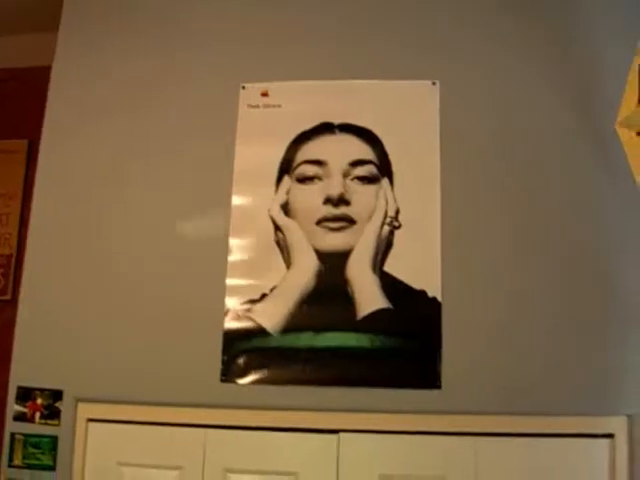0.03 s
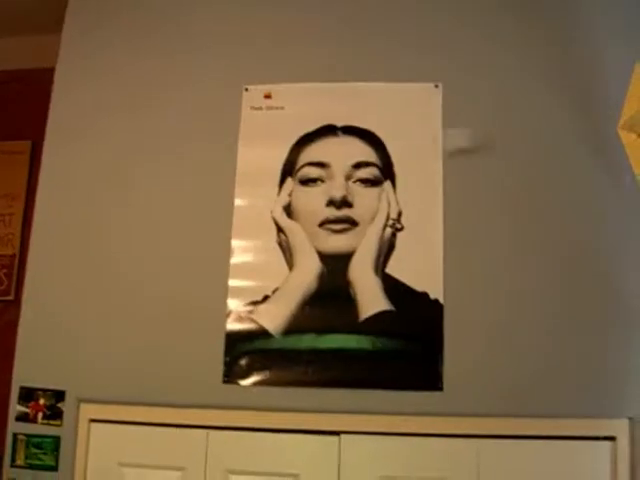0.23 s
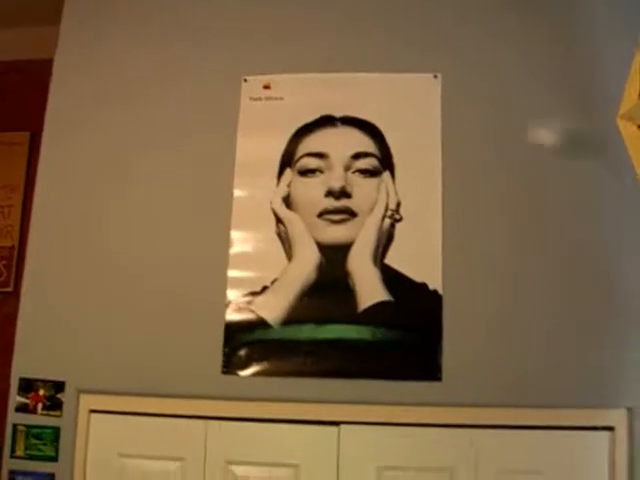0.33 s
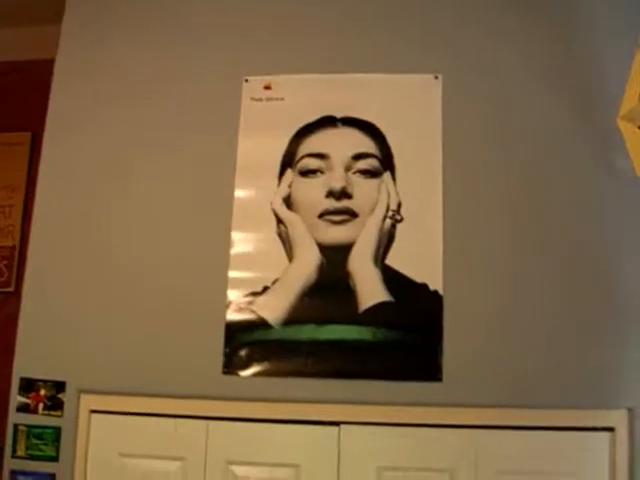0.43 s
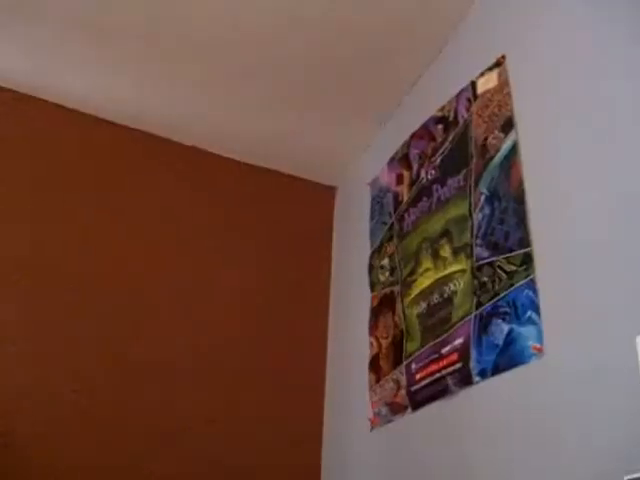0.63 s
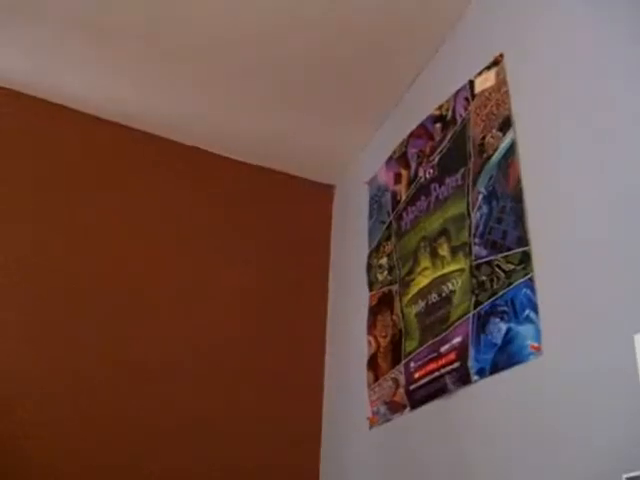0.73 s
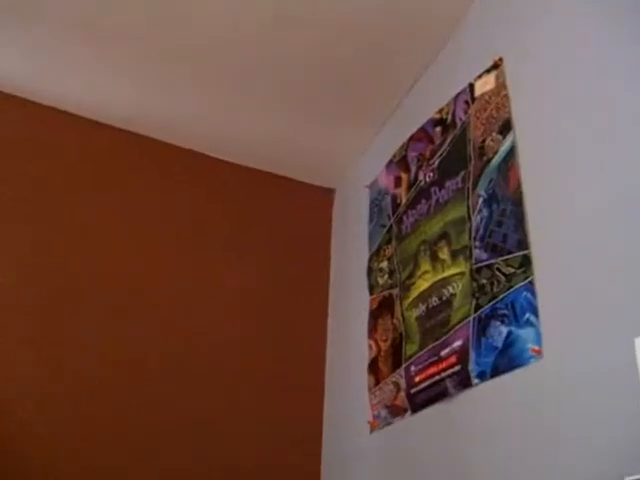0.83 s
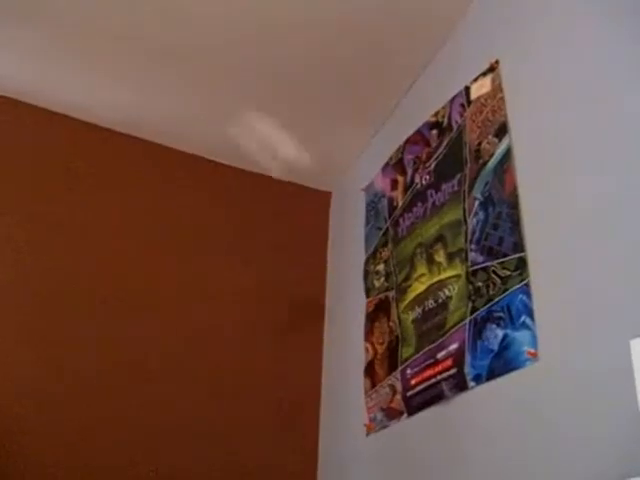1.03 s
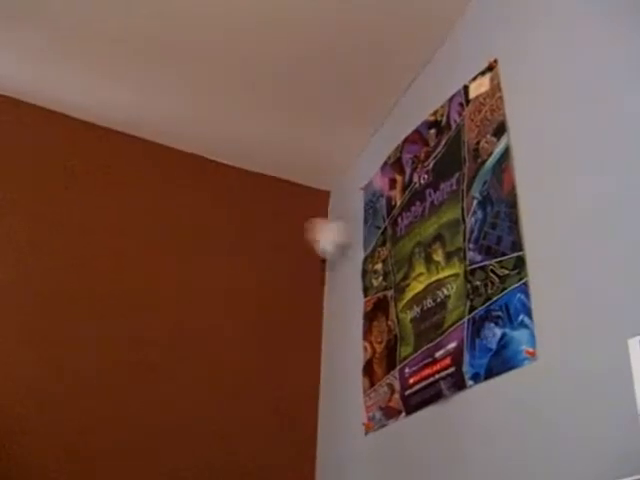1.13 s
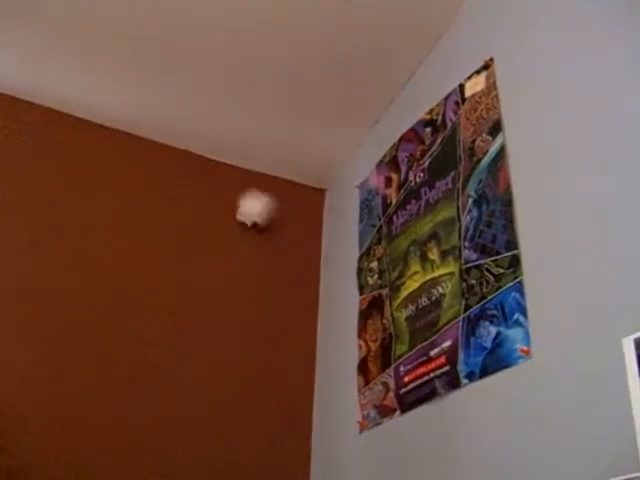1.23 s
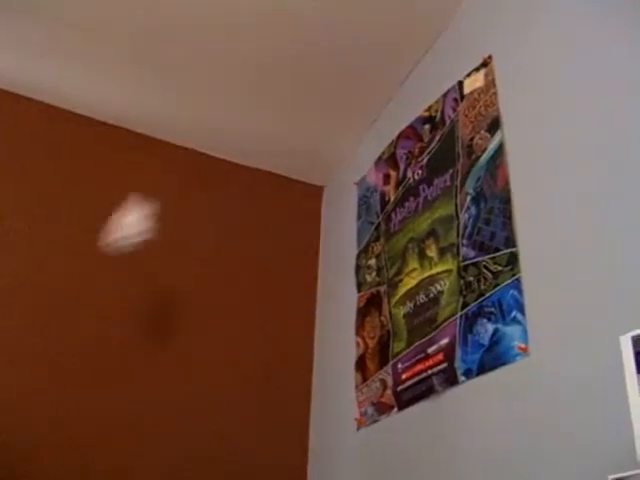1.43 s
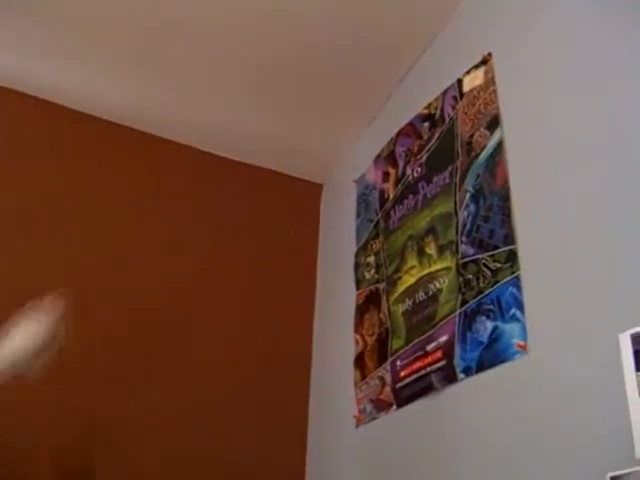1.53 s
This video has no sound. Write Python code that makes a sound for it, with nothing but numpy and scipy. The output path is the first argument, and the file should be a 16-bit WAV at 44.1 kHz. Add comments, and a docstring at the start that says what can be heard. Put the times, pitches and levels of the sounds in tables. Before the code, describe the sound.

A crumpled paper ball smacks a bedroom wall with a low boom, then knocks again. It rustles in a hand, is swatted close to the microphone and grazes the far walls. Soft hiss and a thin camera whine continue behind.

```python
"""A paper ball batted about a bedroom

Each knock of the crumpled ball is a quick crush of many buckling creases, then the room's echo.
It hits a wall, which booms; a second knock stops short. It rustles in the hand, is tossed and
swatted, and grazes the far walls. Behind it all are a soft hiss and a camera's whining motor."""
import sys
import numpy as np
from scipy import signal
from scipy.fft import rfft, irfft
from scipy.io import wavfile
from scipy.ndimage import uniform_filter1d

SR = 44100
rng = np.random.default_rng(int(sys.argv[2]) if len(sys.argv) > 2 else 0)


def store_wav(level_fs):
    """Save 16-bit WAV to argv[1]."""
    pcm = np.round(np.clip(np.atleast_2d(level_fs), -1, 1) * 32767)
    wavfile.write(sys.argv[1], SR, pcm.T.astype(np.int16))


N = 70560
T = np.arange(N) / SR
CUTOFF_S = 0.609  # the second knock stops and the background steps up

# tone colour of paper hitting the wall (f/Hz, level/dB)
WALL_COLOUR = [(90, -13), (200, -19.5), (420, -14.5), (560, -16), (780, -12), (960, -6.5), (1150, -12.5),
               (2000, -5), (2500, -5), (3000, -3.5), (3650, -2.5), (4500, -6.5), (5900, -12), (7700, -9),
               (10000, -13.5), (14300, -24.5), (15500, -29)]


def wall_knock():
    """The ball crumples against a wall in four quick touches."""
    # the touches (t/s, rise/s, hold/s, fade/s, level/dB, treble/dB per octave)
    touches = [(0.2026, 0.00057, 0.0078, 0.0041, -26.5, 3.5), (0.2099, 0.00018, 0.00046, 0.0074, -19, 0.5),
               (0.2130, 0.0014, 0.0029, 0.0036, -13, 1.5), (0.219, 0.0012, 0.0034, 0.0094, -22, -0.5)]
    return contacts(touches, WALL_COLOUR, echo_db=0)


def short_knock():
    """A second knock that stops abruptly, echo and all."""
    # the touches (t/s, rise/s, hold/s, fade/s, level/dB, treble/dB per octave)
    touches = [(0.6003, 0.00065, 0.002, .002, -23, -2.5), (0.6030, 0.0027, 0.0052, 0.0018, -11, 1)]
    # tone colour of this knock (f/Hz, level/dB)
    spectrum = [(47, -31), (80, -3), (269, -23), (521, 0.5), (903, -19), (1130, -1), (1500, -21),
                (2380, 1.5), (2660, -4), (3620, -2), (5040, -6.5), (6010, -2), (7170, -10.5), (7830, -0.5),
                (9980, -10.5), (10900, -7), (15500, -20)]
    return contacts(touches, spectrum, echo_db=-5.5) * (T < CUTOFF_S)


def swat():
    """A swat close by crushes the paper sharply."""
    # the touches (t/s, rise/s, hold/s, fade/s, level/dB, treble/dB per octave)
    touches = [(1.1882, 0.001, 0.0016, 0.00033, -8.5, 1), (1.1915, 0.00038, 0.0021, 0.0017, -11, -1.5),
               (1.1950, 0.0012, 0.00063, 0.00093, -11, 1.5)]
    # tone colour of the swat (f/Hz, level/dB)
    spectrum = [(50, -30), (90, -9), (200, -8.5), (550, -3), (850, -8), (1400, -8), (1800, -8.5),
                (3000, -3.5), (4400, -0.5), (6500, -1.5), (8300, -10), (11000, -10), (15500, -21)]
    return contacts(touches, spectrum, echo_db=-5.5)


def hand_crinkle(snap_s=0.00035, echo_db=-5.5):
    """A hand squeezes and releases the ball, so its creases snap and rustle."""
    # single creases snapping (t/s, level/dB)
    snaps = [(0.745, -31.5), (0.7655, -30.5), (0.786, -25.5), (0.7954, -27), (0.8222, -26)]
    # squeezes (t/s, rise/s, hold/s, fade/s, level/dB, treble/dB per octave)
    squeezes = [(0.8222, 0.00032, .001, 0.0087, -30.5, -0.5), (0.8768, .0004, 0.0015, 0.0093, -26, -1),
                (0.8850, 0.00048, 0.0012, 0.00084, -15, -0.5), (0.8875, .001, 0.0026, 0.0042, -21.5, -0.5)]
    # loudness of the rustle (t/s, level/dB)
    loudness = [(0.735, -57.5), (0.765, -41.5), (0.81, -42), (0.85, -38), (0.875, -33.5), (0.915, -34.5),
                (0.95, -51), (0.99, -82)]
    # tone colour of paper in the hand (f/Hz, level/dB)
    spectrum = [(120, -45), (200, -10), (378, -10.5), (488, -7), (607, -14), (742, -4), (940, -10.5),
                (1950, -6), (2800, -1.5), (3070, -4.5), (5800, 1), (9660, -13), (15500, -18)]
    snapping = sum(crush(spectrum, start, snap_s / 2, snap_s / 2, snap_s, db, 0) for start, db in snaps)
    squeezing = contacts(squeezes, spectrum, echo_db)
    return squeezing + room(snapping + rustle(loudness, spectrum), echo_db)


def wall_skid(echo_db=-0.5):
    """The swatted ball grazes the far walls and slides along them."""
    # glancing touches (t/s, rise/s, hold/s, fade/s, level/dB, treble/dB per octave)
    grazes = [(1.2088, 0.00046, 0.0087, 0.0074, -24.5, -2.5), (1.2502, .0003, 0.00078, 0.0027, -19, 1.5),
              (1.260, 0.0061, 0.011, 0.017, -25.5, -1), (1.3085, 0.00056, 0.0054, 0.0092, -24, 2),
              (1.326, 0.0012, 0.0045, 0.0076, -33, -4)]
    # loudness of the slide (t/s, level/dB)
    loudness = [(1.19, -90), (1.215, -30.5), (1.30, -32.5), (1.345, -46), (1.40, -59.5)]
    # tone colour of grazing paper (f/Hz, level/dB)
    spectrum = [(150, -16.5), (250, -10.5), (380, -20), (620, -3), (1000, -5.5), (1600, -3), (2000, 0.5),
                (2400, -3.5), (3100, 1.5), (6200, 1), (8000, -1.5), (11000, -10), (15500, -18)]
    return contacts(grazes, spectrum, echo_db) + room(rustle(loudness, spectrum), echo_db)


def contacts(touches, spectrum, echo_db, echoes=4):
    """Each side of the ball crackles in its own way: one is heard directly, the rest as echoes."""
    direct, *sides = [sum(crush(spectrum, *touch) for touch in touches) for _ in range(echoes + 1)]
    return direct + amp(echo_db) * sum(reflections(side) for side in sides) / np.sqrt(echoes)


def crush(spectrum, start, rise, hold, fade, db, treble_db):
    """One touch: a burst of creases, coloured by the ball and what it meets."""
    at = int(start * SR)
    shape = envelope(start, rise, hold, fade)[at:at + SR // 10]
    burst = shape * creases(per_second=8000, spread_db=2.5, size=len(shape))
    crackle = evened(burst) * shape ** 0.25  # trims what the evening-out smears in time
    sound = levelled(colour(crackle, spectrum, treble_db), shape, db)
    return np.r_[np.zeros(at), sound, np.zeros(N)][:N]


def rustle(loudness, spectrum):
    """Steady creasing that follows a loudness curve."""
    gain = amp(np.interp(T, *np.transpose(loudness)))
    return colour(creases(per_second=1700, spread_db=3.5) * gain, spectrum)


def creases(per_second, spread_db, size=N, rubbing=0.58):
    """Buckling paper makes clicks of uneven size, over the hiss of rubbing."""
    strength = amp(spread_db * np.minimum(rng.exponential(1, size), 3))
    clicks = strength * rng.choice([-1, 1], size) * (rng.random(size) < per_second / SR)
    return unit(unit(clicks) + rubbing * rng.standard_normal(size))


def wall_boom(start_s=0.212, rise_s=0.027):
    """The plasterboard wall rings with low notes after the first knock."""
    # the wall's notes (f/Hz, level/dB, time to fade by 60 dB/s)
    notes = [(87.2, -28, 0.51), (98, -23, 0.18), (35.6, -34, 0.79), (200, -47, 0.21), (421, -43, 0.58)]
    t = np.maximum(T - start_s, 0)
    ringing = sum(amp(db - 60 * t / ring_s) * np.sin(2 * np.pi * hz * t) for hz, db, ring_s in notes)
    return np.minimum(t / rise_s, 1) * ringing


def dull_bumps():
    """Bursts of low noise that go with the throws and hits."""
    # the bumps (t/s, rise/s, fade/s, level/dB, f/Hz, width/Hz)
    bumps = [(0.147, 0.014, 0.072, -41.5, 31.2, 12), (0.918, 0.0094, 0.03, -34, 169, 280),
             (0.945, .005, 0.028, -37.5, 120, 130), (1.187, 0.0017, 0.016, -28, 192.5, 83),
             (1.249, 0.01, 0.058, -35.5, 163, 72)]
    out = np.zeros(N)
    for start, rise, fade, db, hz, width_hz in bumps:
        shape = envelope(start, rise, 0, fade)
        out += levelled(shape * band(hz, width_hz), shape, db)
    return out


def room(x, echo_db):
    """A sound together with its echo."""
    return x + amp(echo_db) * reflections(x)


def reflections(x, delay_s=0.0023, build_s=0.0057):
    """Many reflections blur into one echo, whose high notes die first."""
    # how long the room rings (f/Hz, time to fade by 60 dB/s)
    ring_times = [(150, 0.5), (500, .5), (1400, 0.31), (3700, 0.3352), (8000, 0.2434), (15000, 0.34)]
    # tone colour of the echo (f/Hz, level/dB)
    spectrum = [(100, -3), (500, -1), (1500, 0.5), (4000, -7), (8000, 1), (11000, -6), (15000, -1.5)]
    hz, t, noise = signal.stft(rng.standard_normal(SR // 2), SR, nperseg=256)
    fading = amp(read(spectrum, hz)[:, None] - 60 * t / read(ring_times, hz)[:, None])
    tail = signal.istft(noise * fading, SR, nperseg=256)[1]
    tail *= np.clip((T[:len(tail)] - delay_s) / build_s, 0, 1)
    return signal.fftconvolve(x, tail / np.linalg.norm(tail))[:N]


def steady_hiss(early_db=-47.5, late_db=-46.5):
    """Soft noise that changes colour and gets a little louder at CUTOFF_S."""
    # tone colour of the early hiss (f/Hz, level/dB)
    early_colour = [(15, -32), (25, 5), (90, -3), (200, -8), (370, -8.5), (520, -8.5), (1170, -13),
                    (2500, -17), (5700, -21), (7500, -14.5), (9000, -19), (15500, -18.5)]
    # tone colour of the late hiss (f/Hz, level/dB)
    late_colour = [(15, -25), (25, 4.5), (90, -8.5), (230, -7), (570, -5.5), (720, -9), (2100, -18),
                   (6000, -19.5), (7500, -14), (9000, -21), (15500, -20)]
    early = amp(early_db) * colour(rng.standard_normal(N), early_colour)
    late = amp(late_db) * colour(rng.standard_normal(N), late_colour)
    return np.where(T < CUTOFF_S, early, late)


def motor_whine(waver_depth=0.04, waver_hz=30.2):
    """A camera's motor makes thin, wavering tones, louder from CUTOFF_S on."""
    # the motor's tones (f/Hz)
    pitches = [7522, 7494, 6578, 15044, 13184]
    # loudness of each tone (early level/dB, late level/dB)
    levels = [(-49, -45), (-64.5, -60.5), (-65, -59), (-74, -59.5), (-77, -69)]
    out = np.zeros(N)
    for hz, (early_db, late_db) in zip(pitches, levels):
        tone = np.sin(2 * np.pi * (hz * T + rng.random()))
        waver = 1 + waver_depth * band(waver_hz, waver_hz)
        out += amp(np.where(T < CUTOFF_S, early_db, late_db)) * unit(tone * waver)
    return out


def hiss_puffs(rise_s=0.0023):
    """A brief fading hiss at the very start, and another as the second knock stops."""
    # the puffs (t/s, fade/s, level/dB)
    puffs = [(0.0, 0.054, -48), (0.607, 0.014, -36.5)]
    return sum(amp(db) * envelope(start, rise_s, 0, fade) * colour(rng.standard_normal(N), WALL_COLOUR)
               for start, fade, db in puffs)


def amp(db):
    """Turns decibels into a gain."""
    return 10 ** (np.asarray(db) / 20)


def unit(x):
    """Scales a sound to an average power of 1."""
    return x / np.sqrt(np.mean(x ** 2) + 1e-20)


def read(points, hz):
    """Reads between a table's rows, with octaves evenly spaced."""
    f, value = np.transpose(points)
    return np.interp(np.log(hz + 1), np.log(f + 1), value)


def colour(x, points, treble_db=0):
    """Gives a sound a tone colour, tilted by about treble_db per octave."""
    hz = np.fft.rfftfreq(4096, 1 / SR)
    gain = unit(amp(read(points, hz) + treble_db * np.log2((hz + 300) / 4000)))
    # folding makes the filter ring only after a click, never before it
    cepstrum = irfft(np.log(gain + 1e-5))
    fold = np.r_[1, np.full(2047, 2), 1, np.zeros(2047)]
    click_response = irfft(np.exp(rfft(cepstrum * fold)))
    return signal.fftconvolve(x, click_response)[:N]


def band(hz, width_hz):
    """Noise gathered around one pitch."""
    f = np.fft.rfftfreq(N, 1 / SR)
    return unit(irfft(rfft(rng.standard_normal(N)) / (1 + (2 * (f - hz) / width_hz) ** 2), N))


def envelope(start, rise, hold, fade):
    """A loudness shape that rises in a straight line, holds, then dies away."""
    t = T - start
    return np.clip(t / rise, 0, 1) * np.exp(-np.maximum(t - rise - hold, 0) / fade)


def levelled(x, shape, db):
    """Gives a sound the energy of a loudness shape at this level."""
    return amp(db) * x * np.linalg.norm(shape) / (np.linalg.norm(x) + 1e-12)


def evened(x, bins=81):
    """Evens out a burst's lows and highs, so that it has no colour of its own."""
    spectrum = rfft(x, 2 * len(x))
    power = abs(uniform_filter1d(abs(spectrum) ** 2, bins))
    return irfft(spectrum / np.sqrt(power + 1e-12))[:len(x)]


def scene():
    """All the sounds together in one channel."""
    paper = wall_knock() + short_knock() + swat() + hand_crinkle() + wall_skid()
    thuds = wall_boom() + dull_bumps()
    background = steady_hiss() + motor_whine() + hiss_puffs()
    return (paper + thuds + background)[None]


def record(dry, ceiling=0.85, top_hz=15900):
    """Rounds off the tallest peaks, then removes the very highest treble."""
    rounded = dry / (1 + (dry / ceiling) ** 6) ** (1 / 6)
    low_pass = signal.firwin(511, top_hz, window=("kaiser", 9), fs=SR)
    return signal.oaconvolve(rounded, low_pass[None], "same")


dry = scene()
out = record(dry)
store_wav(out)
```